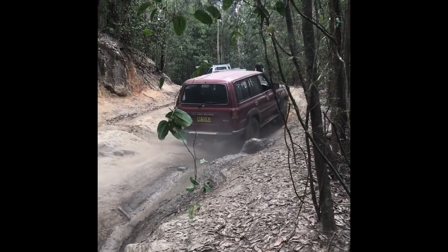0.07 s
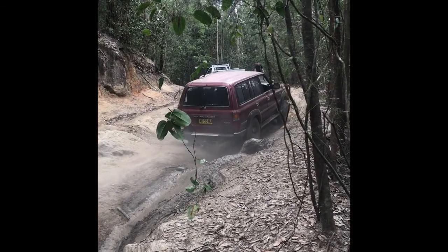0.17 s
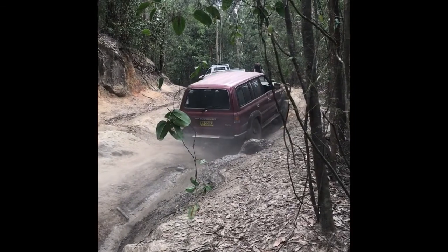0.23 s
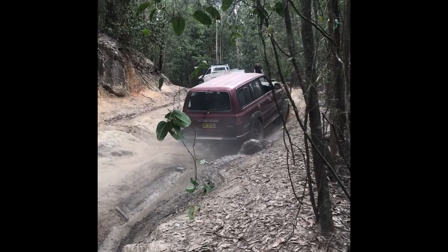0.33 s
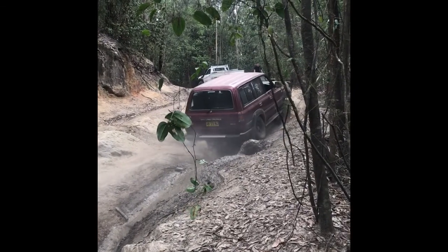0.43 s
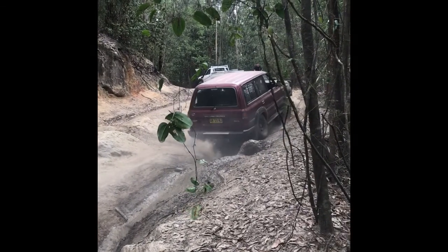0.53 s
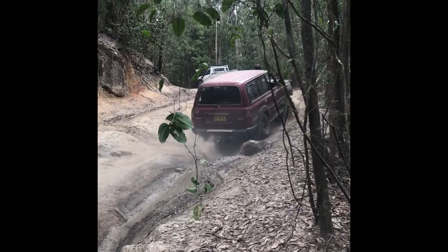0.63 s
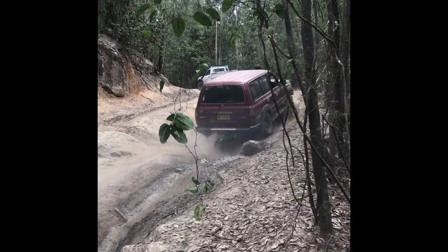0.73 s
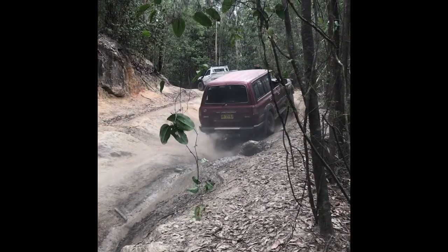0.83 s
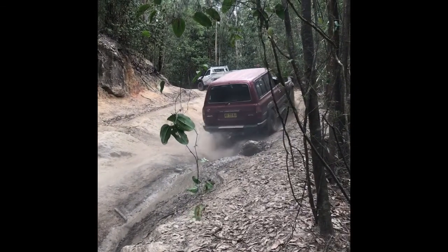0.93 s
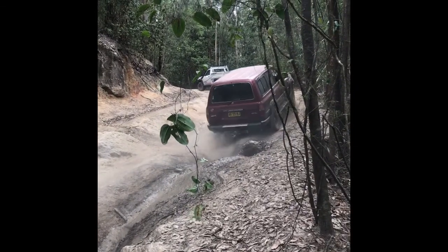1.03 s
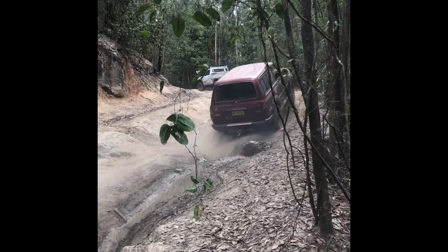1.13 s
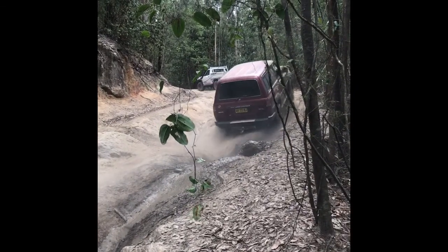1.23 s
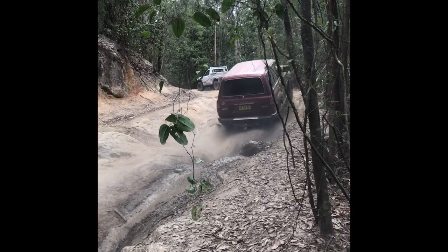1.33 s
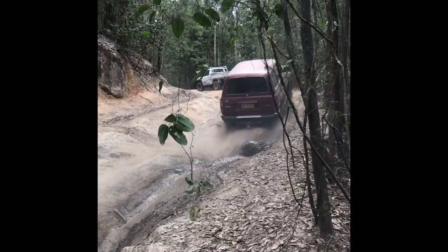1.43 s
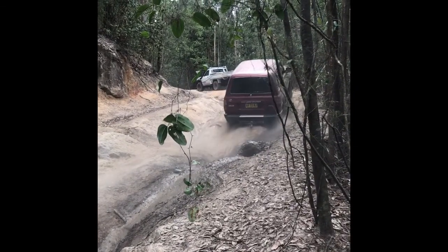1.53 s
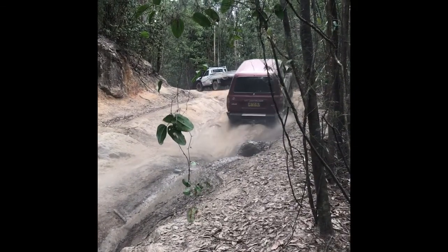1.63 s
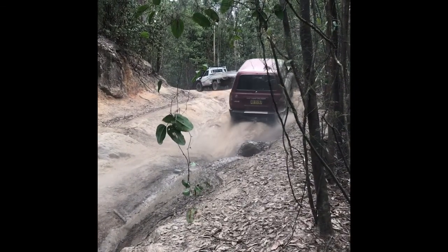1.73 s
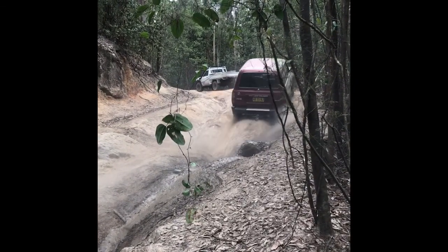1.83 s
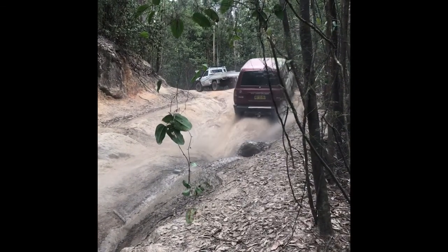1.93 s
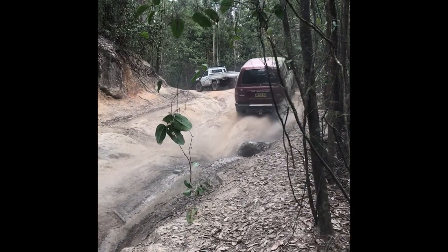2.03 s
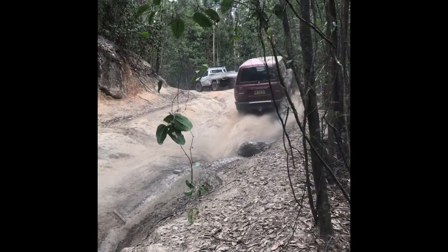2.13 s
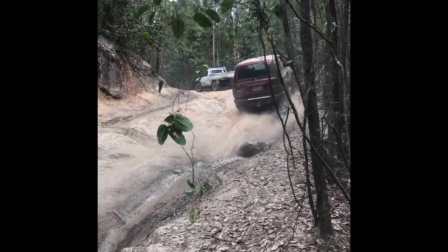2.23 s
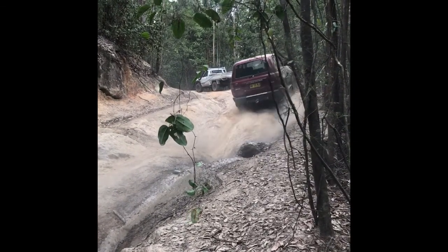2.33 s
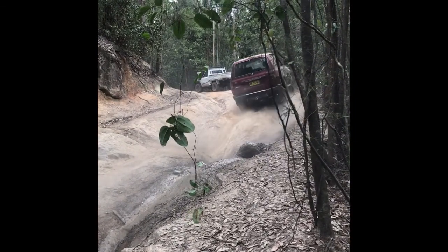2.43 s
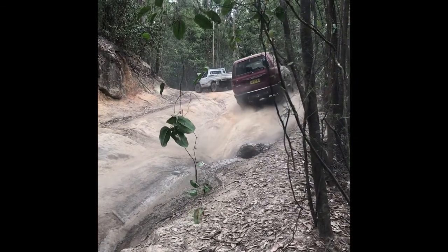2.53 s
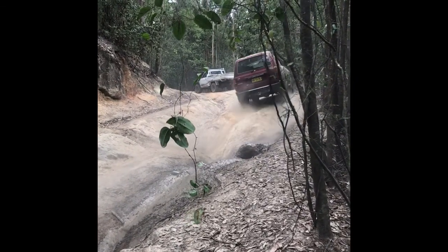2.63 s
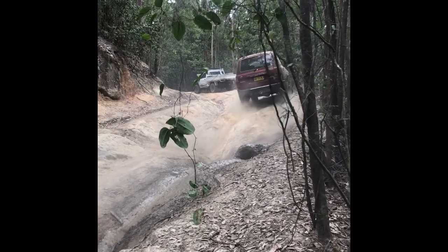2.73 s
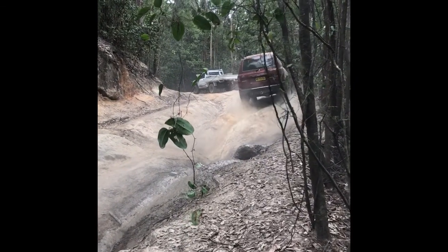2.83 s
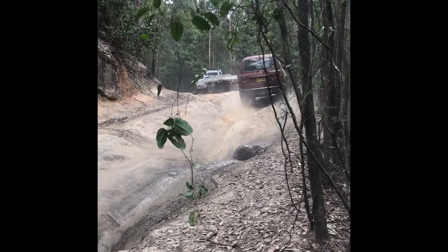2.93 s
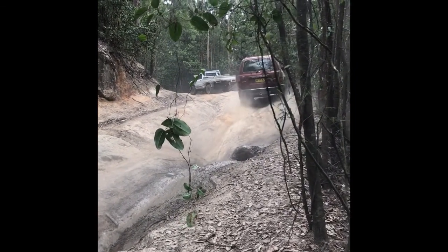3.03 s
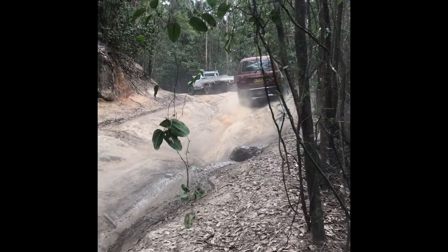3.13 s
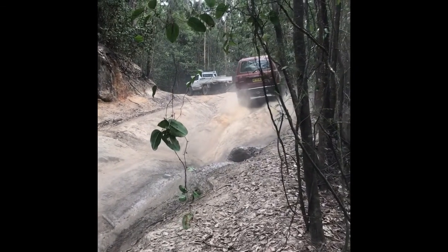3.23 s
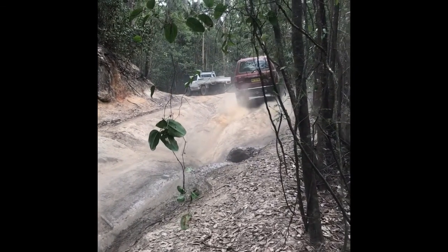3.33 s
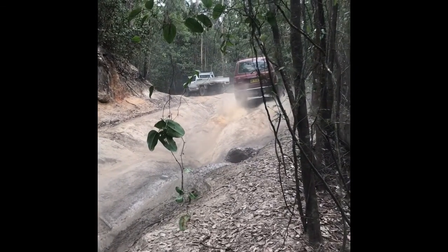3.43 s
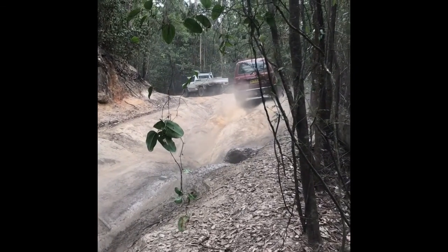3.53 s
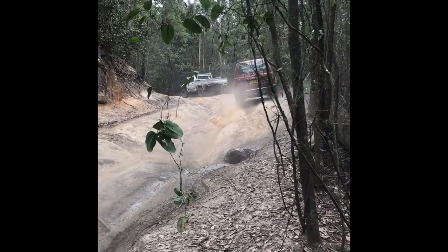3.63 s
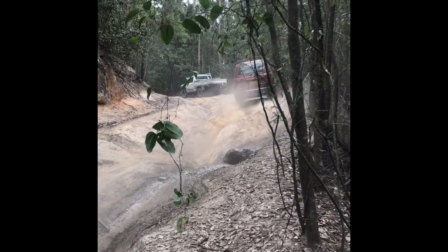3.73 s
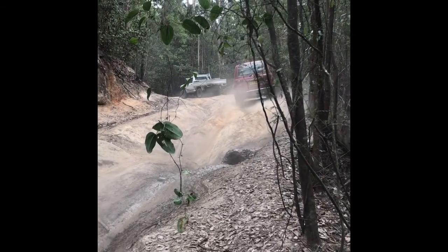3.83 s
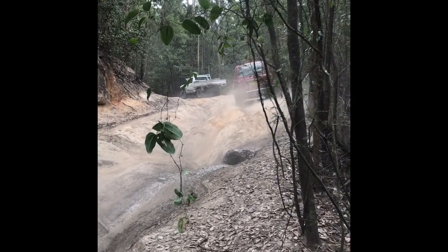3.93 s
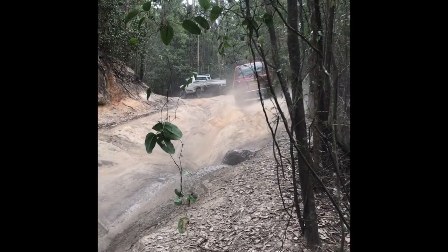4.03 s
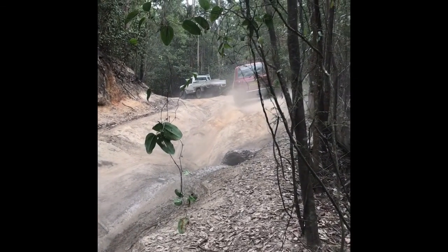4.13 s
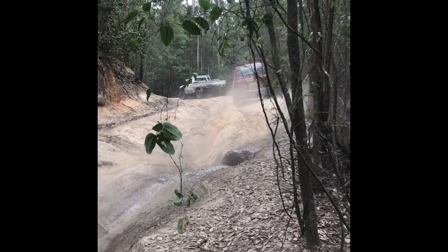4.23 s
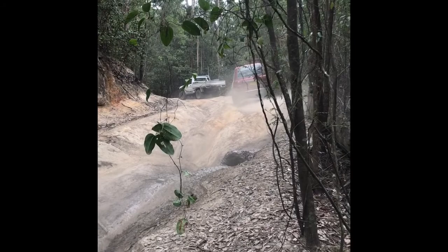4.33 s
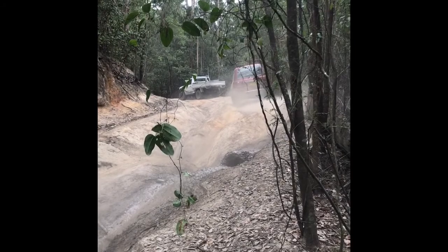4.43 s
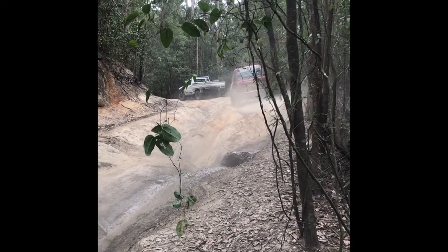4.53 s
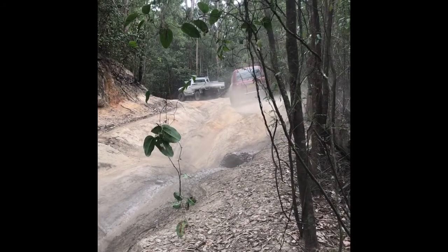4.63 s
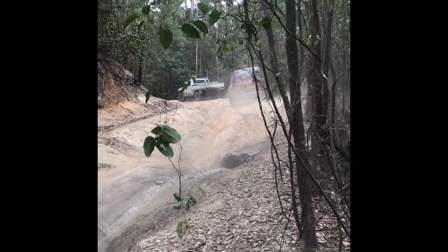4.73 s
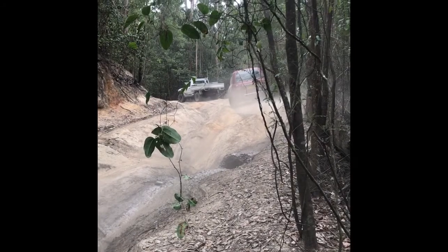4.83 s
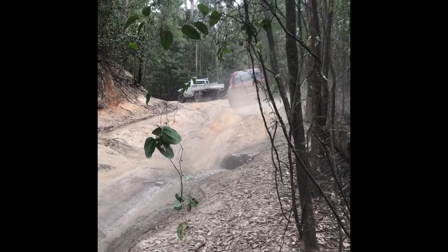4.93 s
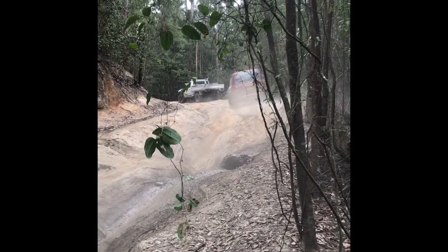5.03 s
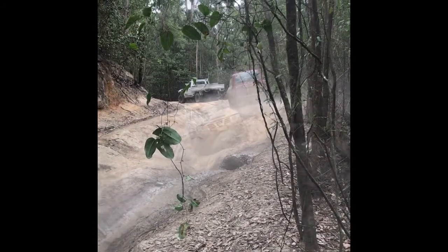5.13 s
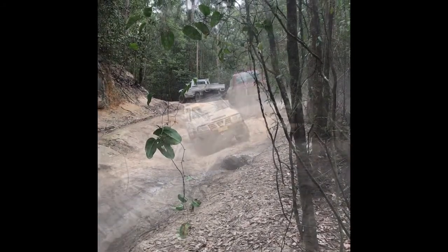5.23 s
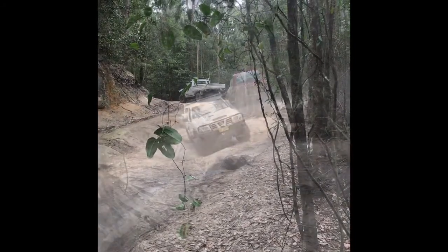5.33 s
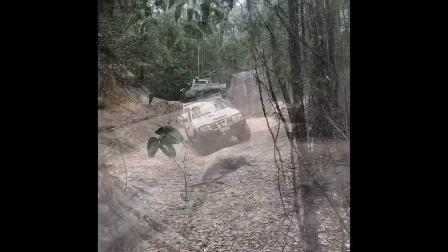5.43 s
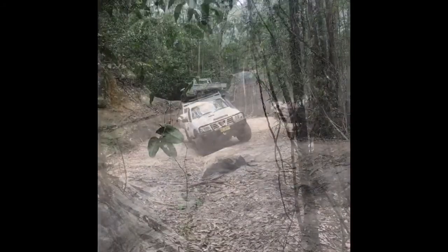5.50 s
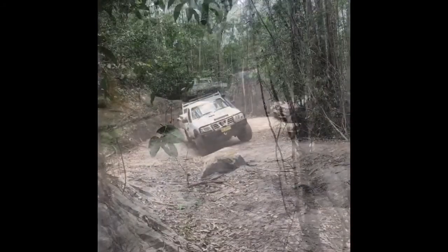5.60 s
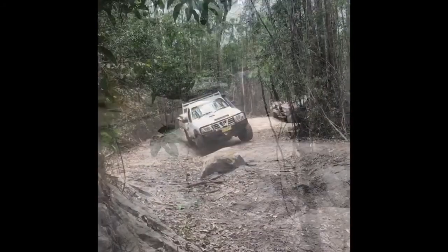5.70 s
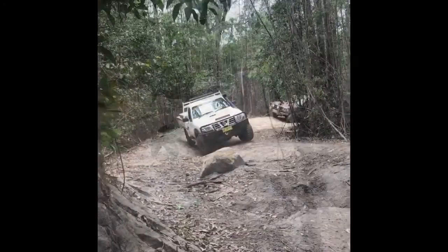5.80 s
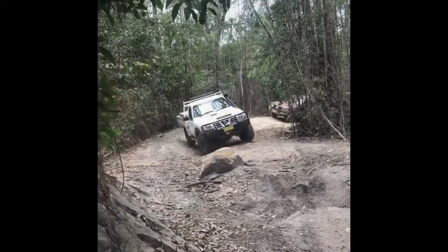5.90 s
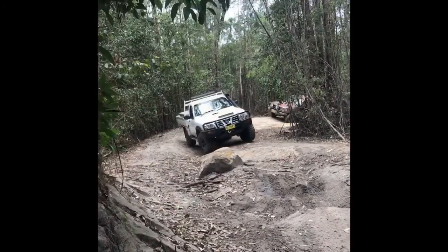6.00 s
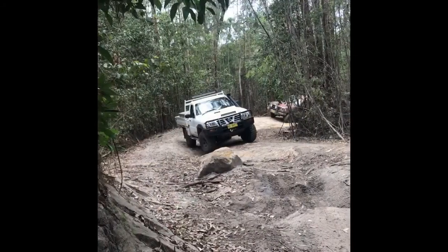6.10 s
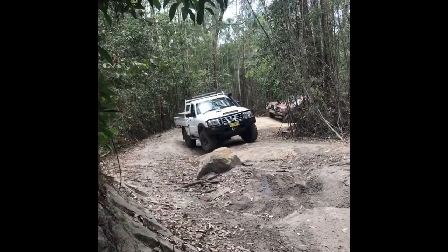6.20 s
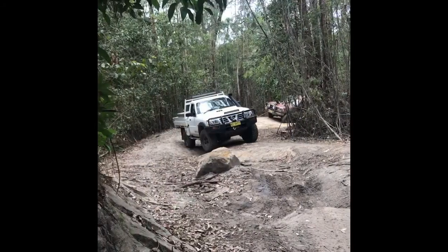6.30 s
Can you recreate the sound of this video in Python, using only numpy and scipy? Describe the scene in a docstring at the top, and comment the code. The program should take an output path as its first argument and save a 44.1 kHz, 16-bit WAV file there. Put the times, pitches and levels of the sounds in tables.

```python
"""A six-cylinder diesel wagon revs in bursts up a rutted sandy forest track, wheels spinning, and draws away.
Its exhaust is a set of wavering multiples of the cycle rate; shaped noise makes the block roar, ringing
panels, thrown sand and rut rumble. Near the end a second truck creeps closer at low revs: exhaust lines in
step, noise clatter twice a crank turn, hiss. A high insect buzz is throbbing narrow noise, one twig tick
a windowed sine, the leaves a steady noise wash."""
import sys
import numpy as np
from scipy import signal
from scipy.fft import rfft, irfft
from scipy.io import wavfile
from scipy.ndimage import uniform_filter1d

SR = 44100
rng = np.random.default_rng(int(sys.argv[2]) if len(sys.argv) > 2 else 0)


def digitize_waveform(pressure):
    """Quantize a signal to 16-bit integers and store it at the path in sys.argv[1].

    Rows of a 2-D input are taken as channels; values are limited to [-1, 1].
    """
    field = np.atleast_2d(pressure).T
    bounded = np.clip(field, -1, 1)
    quanta = np.round(bounded * 32767).astype(np.int16)
    wavfile.write(sys.argv[1], SR, quanta)


N = 280476
T = np.arange(N) / SR


def undb(db):
    """Amplitude ratio of a level in dB."""
    return 10 ** (np.asarray(db) / 20)


def unit(x):
    """Scales to rms 1."""
    return x / np.sqrt(np.mean(x ** 2))


def read(table):
    """Columns of a curve table, one value per sample."""
    s, *columns = np.transpose(table)
    return [np.interp(T, s, c) for c in columns]


def bump(at_s, length_s):
    """Gaussian swell; length_s is the half width at 1/e."""
    return np.exp(-((T - at_s) / length_s) ** 2)


def walk(rate_hz):
    """Random levels held 1 / rate_hz and slewed twice; spread near 1."""
    k = int(SR / rate_hz)
    held = np.repeat(rng.standard_normal(N // 20)[:N // k + 1], k)
    return 1.6 * uniform_filter1d(uniform_filter1d(held, k), k)[:N]


def colour(x, table):
    """Shapes a noise to a spectrum of (f/Hz, relative level/dB) points; rms 1."""
    hz, db = np.transpose(table)
    f = np.maximum(np.arange(N // 2 + 1) * SR / N, 1)
    gain = undb(np.interp(np.log(f), np.log(hz), db))
    return unit(irfft(rfft(x) * gain, N))


def band(x, hz, width_hz):
    """Passes x through one resonance."""
    return signal.lfilter(*signal.iirpeak(hz, hz / width_hz, SR), x)


def ring(x, hz, width_hz):
    """The same resonance twice over; rms 1."""
    return unit(band(band(x, hz, width_hz), hz, width_hz))


def line(turns, multiple, db, waver_db, drift_rad, start_turns):
    """One multiple of a turning rate; uneven burning makes its size and phase wander."""
    phase = 2 * np.pi * (multiple * turns + start_turns) + drift_rad * walk(14)
    return np.sqrt(2) * undb(db + waver_db * walk(18)) * np.cos(phase)


def wagon():
    """Exhaust lines, roar and ringing panels, thrown sand, and a low jolting rumble over the ruts."""
    # engine speed: t/s, engine cycle rate/Hz
    revs = [(0.0, 24.5), (0.19, 26.9), (0.3, 27.4), (0.43, 24.5), (0.54, 22.9), (0.64, 23.5), (0.86, 27.4),
            (1.0, 27.5), (1.11, 27.1), (1.3, 29.1), (1.49, 28.8), (1.64, 27.2), (1.83, 25.9), (2.04, 26.6),
            (2.13, 26.2), (2.35, 22.0), (2.45, 22.5), (2.63, 24.6), (2.78, 25.1), (2.88, 24.9),
            (3.06, 21.9), (3.22, 22.2), (3.46, 24.9), (3.72, 24.8), (3.92, 26.4), (4.1, 26.5), (4.31, 23.6),
            (4.5, 21.4), (4.68, 18.5), (4.9, 17.9), (5.07, 17.3), (5.36, 15.0), (5.66, 15.9)]
    # wheelspin noise: t/s, roar level/dB, sand hiss level/dB (4.5 is added below)
    wheelspin = [(0.0, -33, -38), (0.29, -30, -36), (0.35, -37, -41.5), (0.58, -37.5, -42.5),
                 (0.74, -32, -40.5), (0.83, -34.5, -37), (1.0, -31, -39), (1.12, -32, -37.5),
                 (1.24, -27.5, -36), (1.44, -33.5, -38), (1.75, -34, -42.5), (2.06, -32.5, -43),
                 (2.21, -39, -45.5), (2.32, -39, -45.5), (2.44, -34.5, -42), (2.83, -35.5, -42),
                 (3.09, -43, -46), (3.38, -36.5, -41.5), (3.75, -37.5, -42), (4.07, -39, -44.5),
                 (4.31, -45.5, -48), (4.63, -50, -52.5), (4.83, -50, -52.5), (5.1, -53, -54),
                 (5.15, -59, -55), (5.4, -65, -58), (5.8, -64.5, -63.5)]
    cycle_hz, = read(revs)
    roar_db, sand_db = read(wheelspin)
    turns = np.cumsum(cycle_hz) / SR
    puff = 1 + 0.12 * np.cos(2 * np.pi * 6 * turns) + 0.08 * np.cos(2 * np.pi * turns)
    exhaust = wagon_exhaust(cycle_hz, turns, roar_db)
    roar, panels, tones = engine_block(turns, puff)
    sand = thrown_sand(turns, puff)
    gone = np.clip((5.72 - T) / 0.084, 0, 1)  # the driver lets the engine die down behind the bend
    block = undb(roar_db) * (roar + panels)
    return gone * (exhaust + rut_rumble() + tones + block + undb(sand_db + 4.5) * sand)


def wagon_exhaust(cycle_hz, turns, roar_db):
    """Firing line (6th) and its overtone, 4th and 10th lines, and the weak lines of the uneven cycle."""
    # other lines of the uneven cycle: multiple of the cycle rate, level re roar/dB
    lumps = [(2, -18), (3, -13.5), (5, -26), (7, -10.5), (8, -25), (9, -10), (11, -15.5), (13, -18),
             (14, -15.5), (15, -23), (16, -22.5), (18, -17.5)]
    tail_hz, tail_width_hz, tail_db = 270.6, 2.4, 1.5  # tailpipe resonance lifts the weak lines crossing it
    lope_below_hz, lope_per_hz = 20, .035  # at low revs the exhaust lopes once a cycle
    twelfth_db = -23  # re firing line

    firing_db, fourth_db, tenth_db = exhaust_levels(cycle_hz)
    # multiple, level/dB, waver/dB, phase drift/rad
    strong_lines = [(6, firing_db, .9, .12), (4, fourth_db, .7, .2),
                    (10, tenth_db, .7, .55), (12, firing_db + twelfth_db, 4, .7)]
    exhaust = sum(line(turns, k, db, waver_db, drift, rng.random())
                  for k, db, waver_db, drift in strong_lines)
    lope_depth = lope_per_hz * np.maximum(lope_below_hz - cycle_hz, 0)
    exhaust *= 1 + lope_depth * np.cos(2 * np.pi * turns)
    for k, db in lumps:
        lift_db = tail_db * np.exp(-((k * cycle_hz - tail_hz) / tail_width_hz) ** 2)
        exhaust += line(turns, k, roar_db + db + lift_db, 3.5, .065 * k, rng.random())
    return exhaust


def exhaust_levels(cycle_hz):
    """Levels in dB of the firing, 4th and 10th lines; throttle bursts drive the firing and 10th."""
    # throttle bursts: pressed t/s, full t/s, lifted t/s, shut t/s,
    # firing line level when full/dB, when lifted/dB, 10th line level on the overrun/dB
    bursts = [(-0.2, -0.1, 0.26, 0.35, -24.5, -31.5, -29), (0.47, 0.543, 1.53, 1.68, -25.5, -25.5, -50),
              (1.645, 1.722, 2.06, 2.37, -27, -33, -40), (2.28, 2.462, 2.73, 3.05, -26.5, -24, -37),
              (3.034, 3.39, 4.11, 4.17, -28.5, -29.5, -44), (4.82, 4.883, 5.4, 5.88, -38.5, -37, -52)]
    # brief breaks in the firing line: t/s, 1/e half width/s, change/dB
    stumbles = [(1.81, .018, -11), (1.89, .012, -6), (2.265, .02, -10)]
    # 4th exhaust line: t/s, level/dB
    fourth = [(0, -41.5), (.9, -43), (1.44, -44), (1.75, -46), (2.2, -47), (2.4, -40), (2.8, -45), (3, -49),
              (3.5, -47), (3.7, -43), (4.35, -42), (4.53, -46), (4.6, -55), (5, -54)]
    coast_db = -51  # firing line with the throttle shut
    pipe_hz, pipe_width_hz, pipe_db = 155, 7.8, 2.5  # the firing line swells crossing this resonance
    boom_hz, boom_width_hz = 235.4, 20.4  # resonance of the 10th line
    tenth_db, tenth_pull_db, wander_db = -44.5, -45.5, 1.4  # floor, added in resonance, wander
    overrun_lag_s, overrun_s = 0.15, 0.096  # the 10th line sings after each lift
    bend_s, bend_db_per_s = 3.83, -16  # the bank hides the 10th line's floor and resonance from here on

    pull = undb(coast_db) + sum(np.interp(T, b[:4], [0, undb(b[4]), undb(b[5]), 0]) for b in bursts)
    swell_db = pipe_db * np.exp(-((6 * cycle_hz - pipe_hz) / pipe_width_hz) ** 2)
    stumble_db = sum(db * bump(s, length_s) for s, length_s, db in stumbles)
    firing_db = 20 * np.log10(pull) + swell_db + stumble_db

    hidden = undb(bend_db_per_s * np.maximum(T - bend_s, 0))
    overrun = sum(undb(b[6]) * bump(b[2] + overrun_lag_s, overrun_s) for b in bursts)
    boom = np.exp(-((10 * cycle_hz - boom_hz) / boom_width_hz) ** 2)
    tenth = hidden * (undb(tenth_db) + undb(tenth_pull_db) * boom) + overrun * boom
    return firing_db, read(fourth)[0], 20 * np.log10(tenth) + wander_db * walk(30.16)


def engine_block(turns, puff):
    """Knocks of valves and pistons plus noise, filtered into roar, ringing panels and brief narrow tones."""
    # roar spectrum: f/Hz, relative level per Hz/dB
    roar_spectrum = [(18, -56), (30, -65), (111, -8), (136, -6), (158, -3), (178, -21), (197, -8.5),
                     (257, -3), (421, -15.5), (538, -11.5), (810, -8.5), (994, -13.5), (1200, -13.5),
                     (2300, -24.5), (4000, -79), (5200, -104), (8800, -120)]
    # body and block resonances: f/Hz, width/Hz (times 1.74 below), level re roar at t = 0/dB,
    # slope as the tail swings round/(dB/s)
    resonances = [(373.7, 32, -7, -3), (587, 103, -11, 1.64), (706, 85, -4, -0.8), (834, 118, -2.5, -1.35),
                  (1080, 51, -7.5, -0.9), (1200, 190, -12, 0.96), (1665, 110, -15, 0.9),
                  (2380, 280, -14, -1.2), (3240, 230, -21.5, 2), (3550, 140, -28.5, 3), (4450, 270, -23, 2)]
    # moments when a narrow tone stands out, a ringing panel or a strong exhaust line:
    # t/s, 1/e half width/s, f/Hz, width/Hz, level/dB
    tone_moments = [(0.37, 0.097, 380.4, 8.5, -35), (0.891, 0.056, 741, 35, -27.5),
                    (1.08, 0.12, 382, 5.9, -41), (1.215, 0.086, 1079, 110, -36),
                    (0.974, 0.031, 256, 65, -24.5), (1.41, 0.043, 1700, 100, -45),
                    (0.21, 0.085, 1680, 130, -43), (2.01, 0.14, 1042, 57, -35),
                    (1.43, 0.19, 1215, 130, -39), (1.47, 0.035, 850, 37, -37), (1.71, 0.05, 1040, 63, -35),
                    (2.79, 0.028, 618, 46, -27.5), (4.3, 0.16, 665, 96, -47.5), (4.33, 0.08, 1717, 47, -50),
                    (4.26, 0.34, 3680, 200, -54), (4.95, 0.31, 151, 44, -41.5), (4.38, 0.24, 335, 56, -52),
                    (3.87, 0.19, 1416, 81, -45), (3.2, 0.12, 270, 14, -40), (4.0, .11, 316, 9.1, -43.5),
                    (0.072, 0.089, 257, 40, -34), (1.43, 0.15, 345, 11.7, -35.5)]
    pattern_cycles = 1.8

    # knocks are much alike from cycle to cycle: each pattern crossfades into the next
    patterns = rng.standard_normal((120, 512))
    step = (turns % 1 * 512).astype(int)
    age = turns / pattern_cycles
    old, fade = age.astype(int), np.pi / 2 * (age % 1)
    knocks = np.cos(fade) * patterns[old, step] + np.sin(fade) * patterns[old + 1, step]

    shake = puff * (0.7 * knocks + rng.standard_normal(N))
    roar = colour(puff * (0.5 * knocks + rng.standard_normal(N)), roar_spectrum)
    # the lurching body turns each panel towards and away from the listener
    panels = sum(undb(db + slope_db * T + 1.8 * walk(16)) * ring(shake, f, 1.74 * w)
                 for f, w, db, slope_db in resonances)
    tones = sum(undb(db) * bump(s, length_s) * ring(shake, f, w)
                for s, length_s, f, w, db in tone_moments)
    return roar, panels, tones


def thrown_sand(turns, puff):
    """Noise hiss of grains of unlike size; coarse and fine sand fly in their own handfuls."""
    # sand spectrum: f/Hz, relative level per Hz/dB
    sand_spectrum = [(1060, 0.5), (1800, -5), (2810, -6.5), (4550, -9.5), (5030, -12.5), (6920, -14.5),
                     (7600, -18), (9500, -19.5), (10400, -23.5), (11300, -22), (13500, -23), (15800, -26.5)]
    air_db_per_s = 1  # fine hiss lost in dust and leaves as the wagon draws away
    rasp_once, rasp_thrice = .04, .07  # rasp depth, once and three times a cycle

    grain_db = 0.22 * rng.exponential(size=N) + 0.5 * walk(25.0)
    grains = colour(np.sqrt(puff) * rng.standard_normal(N) * undb(grain_db), sand_spectrum)
    grains = patchy(grains)
    rasp = 1 + rasp_once * np.cos(2 * np.pi * turns) + rasp_thrice * np.cos(2 * np.pi * 3 * turns)
    fine = signal.sosfilt(signal.butter(2, 6000, "high", fs=SR, output="sos"), grains)
    fine_gain = undb(4.35 - air_db_per_s * T + 0.3 * walk(9.2))
    return rasp * (grains - fine) + fine_gain * fine


def patchy(x):
    """Overlapping half-octave slices of a noise flicker each on their own."""
    patch_db, patch_hz = 0.5, 9
    f = np.arange(N // 2 + 1) * SR / N
    octave = np.log2(np.maximum(f, 700) / 700)  # the first slice holds everything below 700 Hz
    spectrum = rfft(x)
    out = np.zeros(N)
    for k in range(11):
        share = np.maximum(1 - abs(2 * octave - k), 0)
        out += undb(patch_db * walk(patch_hz)) * irfft(spectrum * share, N)
    return out


def rut_rumble():
    """Low resonant noise that swells at each jolt over the ruts."""
    # jolts: t/s, rumble level/dB, 1/e half width/s
    jolts = [(0.02, -42, 0.12), (0.422, -35.5, 0.037), (0.59, -33, 0.054), (.85, -39, 0.091),
             (1.07, -31.5, 0.12), (1.2, -34.5, 0.044), (1.753, -39, 0.15), (2.0, -42, 0.088),
             (3.905, -38, 0.066), (5.205, -48, 0.084)]
    ruts_db = -66  # between jolts
    jolting = undb(ruts_db) + sum(undb(db) * bump(s, length_s) for s, db, length_s in jolts)
    return jolting * ring(rng.standard_normal(N), 84, 94)


def truck():
    """Low exhaust lines in step, so they throb as pulses; a diesel clatter knocks twice a crank turn."""
    # creeping truck: t/s, crank rate/Hz, 2nd, 4th and 7th line levels/dB, clatter level/dB (6 is taken off below)
    creep = [(5.2, 23.4, -60, -37, -60, -63), (5.406, 22.5, -52, -36, -58, -64),
             (5.62, 22.5, -51, -40, -52, -62), (5.71, 24.1, -48, -61, -47, -60),
             (5.796, 24.7, -45, -40, -42, -56), (5.952, 24.1, -44, -38, -43, -51),
             (6.126, 22.0, -46, -43, -47, -52), (6.2, 21.5, -47, -42, -47, -51),
             (6.27, 21.9, -49, -37, -47, -50), (6.36, 22.6, -51, -40, -42, -49)]
    # other exhaust lines: multiple of the crank rate, level re the clatter column/dB
    weak_lines = [(3, 1.5), (5, 6), (6, 7.5), (8, -18), (9, 2.5), (10, 0.5), (11, -2.5), (12, -23),
                  (14, -12), (19, -8)]
    # clatter resonances: f/Hz, width/Hz, relative level/dB
    clatter_bands = [(990, 110, 2), (1270, 210, -5.5), (1650, 140, -1), (2340, 200, -5.5), (2750, 470, -27),
                     (510, 75, 2), (754, 170, -7), (180, 60, -9.5)]
    # fan and injector hiss: t/s, level/dB
    fan = [(5.2, -67), (5.7, -50.5), (6.0, -49.5), (6.36, -50)]
    # hiss spectrum: f/Hz, relative level per Hz/dB
    fan_spectrum = [(300, -9), (1500, 0.5), (3000, -5), (5000, -14.5), (8000, -17.5), (12000, -25),
                    (15800, -24)]
    tick_db, tick_share = -22, .2  # injector ticks: level re hiss, decay as a share of the gap
    # the long pipe lets lines above this multiple out later, those below sooner
    pipe_smear, pulse_centre = .025, 5.5  # turns per multiple squared, multiple

    def start(k):
        return -pipe_smear * (k - pulse_centre) ** 2

    crank_hz, second_db, fourth_db, seventh_db, clatter_db = read(creep)
    turns = np.cumsum(crank_hz) / SR
    fourth_fade = np.clip((T - 5.7) / 0.07, 0, 1)  # the 4th line fades in as the wagon falls silent
    exhaust = line(turns, 2, second_db, 1.0, 0.22, 0)
    exhaust += fourth_fade * line(turns, 4, fourth_db, 0.8, 0.26, start(4))
    exhaust += line(turns, 7, seventh_db, 2, .4, start(7))
    exhaust += sum(line(turns, k, clatter_db + db, 2.6, .5, start(k)) for k, db in weak_lines)

    gap = 2 * turns % 1
    knock = (.7 + np.exp(-gap / .3)) * rng.standard_normal(N)
    clatter = sum(undb(db + 0.57 * walk(7.0)) * unit(band(knock, f, w)) for f, w, db in clatter_bands)
    ticks = ring(np.exp(-gap / tick_share) * rng.standard_normal(N), 12000, 7000)
    hiss = undb(read(fan)[0]) * (colour(rng.standard_normal(N), fan_spectrum) + undb(tick_db) * ticks)
    arrival = np.clip((T - 5.05) / 0.37, 0, 1)
    return arrival * (exhaust + undb(clatter_db - 6.0) * clatter + hiss)


def insects():
    """Narrow high noise buzz that throbs and comes and goes; a row ending before it starts is silent."""
    # buzzes: from t/s, to t/s, f/Hz, width/Hz, level before throb/dB, throb rate/Hz
    buzzes = [(3, 2.4, 13450, 250, -72, 12), (2.7, 3.95, 15450, 410, -67, 24)]
    out = np.zeros(N)
    for start_s, end_s, f, w, db, throb_hz in buzzes:
        present = np.clip(np.minimum(T - start_s, end_s - T) / .08, 0, 1)
        throb = 1 + .6 * np.cos(2 * np.pi * throb_hz * T)
        out += present * undb(db + 3.0 * walk(9)) * throb * ring(rng.standard_normal(N), f, w)
    return out


def twig():
    """A dry, very short tick: a 7.8 kHz sine under a Gaussian window."""
    # ticks: t/s, approximate peak level/dB
    snaps = [(4.956, -39)]
    return sum(undb(db) * bump(s, 0.00017) * np.sin(2 * np.pi * 7800 * (T - s)) for s, db in snaps)


def forest():
    """Soft steady noise wash of leaves and far echoes."""
    # wash spectrum: f/Hz, relative level per Hz/dB
    wash_spectrum = [(18, -51), (30, -50), (79, -2), (174, 5.5), (340, -6.5), (497, -18.5), (663, -12),
                     (862, -45), (1150, -13.5), (8660, -53), (15800, -47)]
    wash_db = -42
    return undb(wash_db + 1.2 * walk(3.2)) * colour(rng.standard_normal(N), wash_spectrum)


def scene():
    """All sources summed to one channel."""
    return (wagon() + truck() + insects() + twig() + forest())[None]


def record(dry):
    """A short inverted echo off the case combs the treble; the deepest bass and the top are cut."""
    case_lag_s, case_share, top_hz = 0.0004, 0.09, 15680
    dry = signal.sosfilt(signal.butter(3, 40, "high", fs=SR, output="sos"), dry)
    treble = signal.sosfilt(signal.butter(1, 1500, "high", fs=SR, output="sos"), dry)
    echo = np.array([np.interp(T - case_lag_s, T, c) for c in treble])
    top_cut = signal.ellip(12, .2, 75, top_hz, fs=SR, output="sos")
    return signal.sosfilt(top_cut, dry - case_share * echo)


dry = scene()
out = record(dry)
digitize_waveform(out)
```